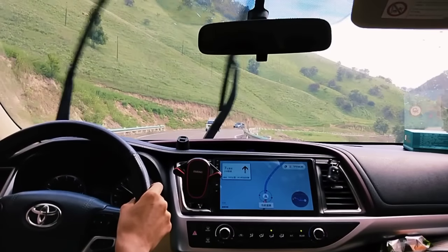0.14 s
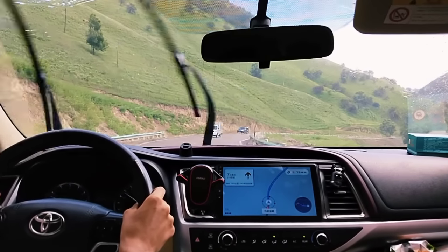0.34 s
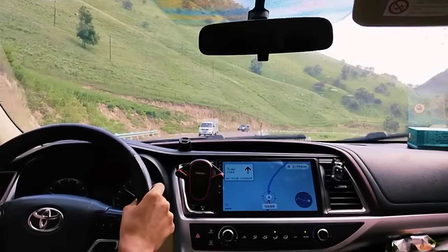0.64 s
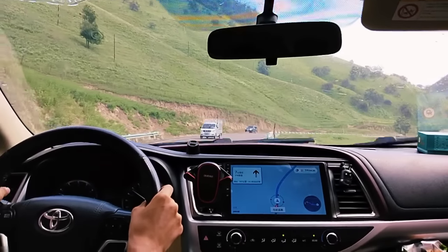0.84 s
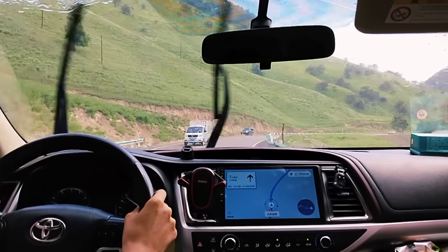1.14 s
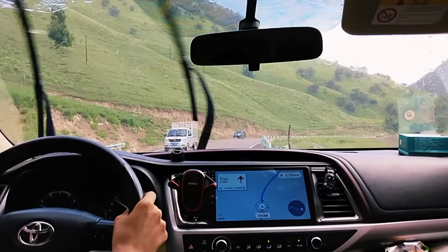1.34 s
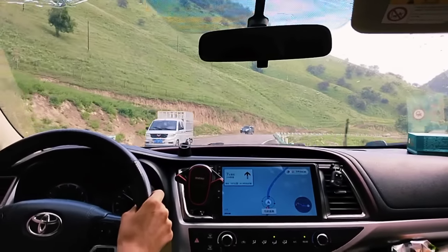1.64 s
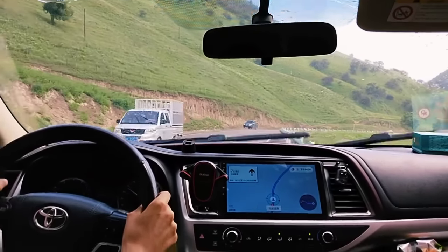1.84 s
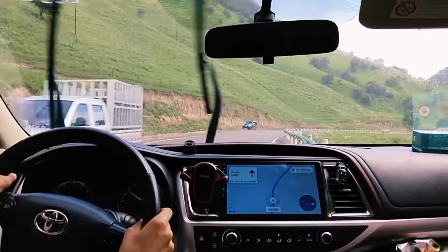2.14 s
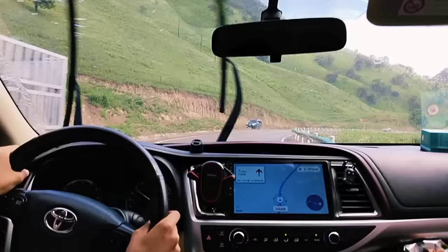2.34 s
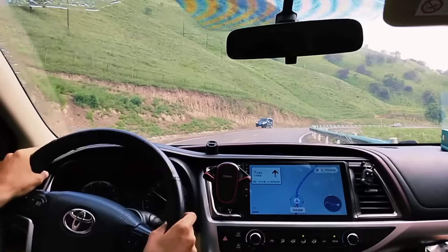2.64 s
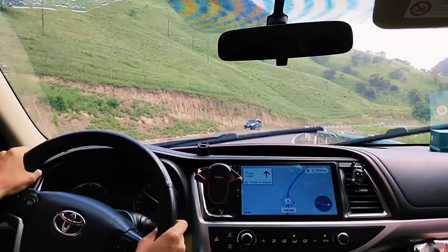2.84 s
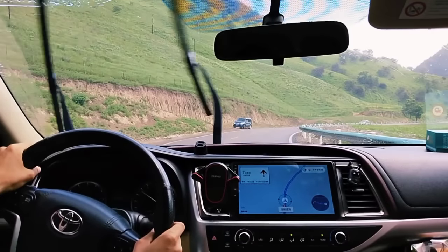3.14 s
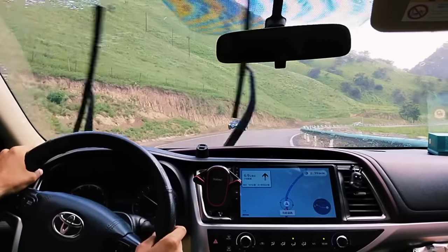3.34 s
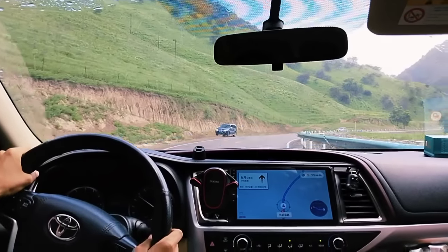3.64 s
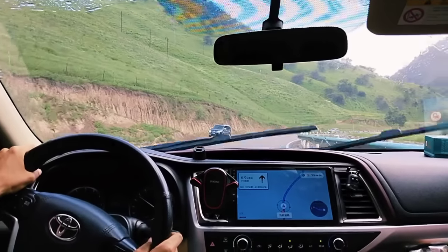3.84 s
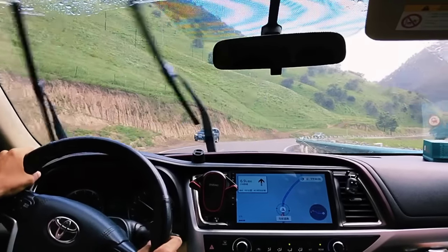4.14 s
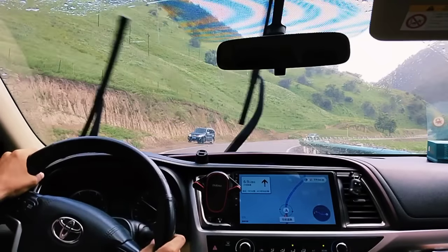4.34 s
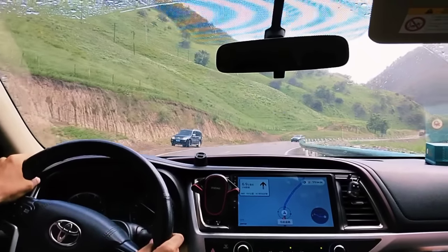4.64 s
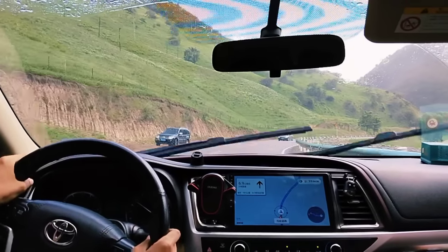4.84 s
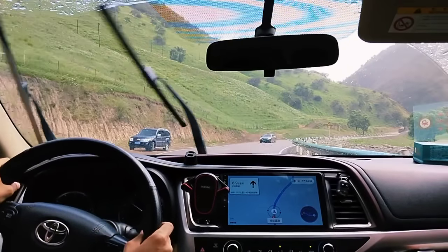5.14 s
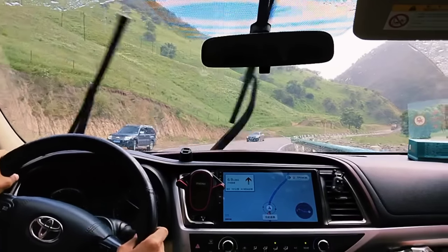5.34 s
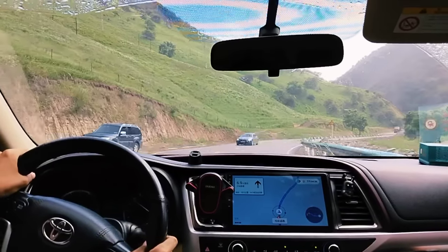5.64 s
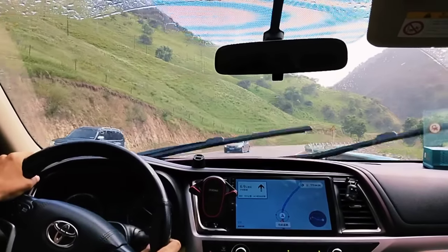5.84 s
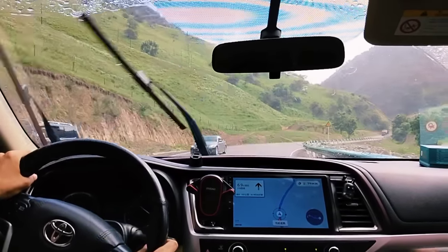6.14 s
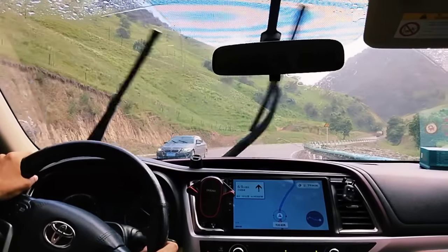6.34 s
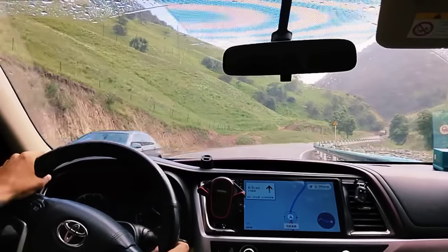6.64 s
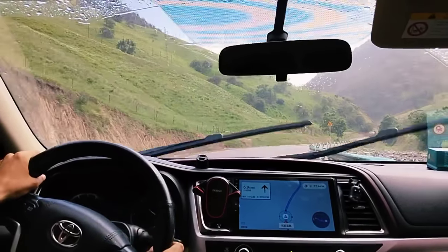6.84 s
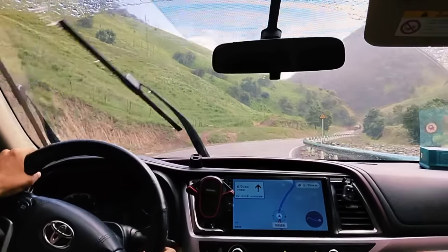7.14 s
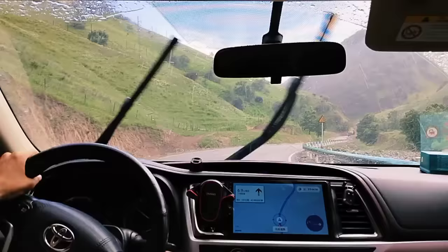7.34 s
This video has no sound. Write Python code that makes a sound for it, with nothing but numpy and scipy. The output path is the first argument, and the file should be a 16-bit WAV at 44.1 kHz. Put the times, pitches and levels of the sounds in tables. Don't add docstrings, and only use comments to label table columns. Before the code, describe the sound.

Bright rain patter fills a closed car cabin, swelling in short gusts and thinning in brief lulls. Single hard drops tick and splash close by on the glass. Beneath, muffled double thuds mark each wiper reversal at an even one-second pace, with a bump at the start and another near two seconds. Fine spray hisses behind; road rumble is very quiet and choppy from phone noise reduction.

```python
import sys
import numpy as np
from scipy import signal
from scipy.fft import rfft, irfft
from scipy.io import wavfile
from scipy.ndimage import uniform_filter1d

SR = 44100
rng = np.random.default_rng(int(sys.argv[2]) if len(sys.argv) > 2 else 0)


def wav_record(signal):
    frames = np.transpose(np.atleast_2d(signal))
    bounded = np.clip(frames, -1, 1)
    quanta = np.round(bounded * 32767).astype(np.int16)
    wavfile.write(sys.argv[1], SR, quanta)


def makeup_ratio(level_db):
    decades = np.asarray(level_db, float) / 20
    return 10 ** decades


N = 329868

# start_s, patter_db, leak_db (of the channel that never closes)
RAIN = [(0, -45.5, -60.5), (.96, -47.5, -56.5), (1.36, -49, -64.5), (1.66, -51, -58.5), (1.95, -49, -61),
        (2.3, -49, -52.5), (3.3, -47, -56.5), (3.75, -47, -56), (4.05, -50, -57), (4.25, -46, -56),
        (4.6, -44.5, -53.5), (5.07, -46.5, -51.5), (5.6, -47.5, -54.5), (5.96, -45, -51.5),
        (6.25, -48, -60.5), (6.58, -43, -53), (7.04, -47, -61), (7.48, -44, -54.5)]
# frequency_hz, density_db (per Hz)
GLASS = [(2150, -41.5), (2340, 1.5), (2660, 6), (3170, 6.5), (5210, 0.5), (7020, -5.5), (8640, -4.5),
         (11500, -15.5), (14900, -23.5), (15700, -28)]
# ring_hz, width_hz
PLACES = [(2650, 170), (3200, 69), (3900, 3100), (4500, 2600), (5600, 2400), (8500, 8000)]
# start_s, peak_db
LARGE_DROPS = [(0.022, -26), (0.386, -32), (0.776, -32), (1.323, -31.5), (1.982, -31), (2.41, -28.5),
               (2.4495, -30), (3.0418, -26), (3.056, -25), (3.2801, -30.5), (3.5749, -29), (3.6112, -30),
               (3.694, -34), (3.7622, -29), (3.782, -30), (3.8144, -30.5), (4.5799, -31), (4.633, -28.5),
               (4.7496, -32), (4.792, -30), (4.8455, -29), (5.036, -28.5), (5.0713, -29.5), (5.4472, -28.5),
               (5.9717, -29), (6.3756, -29.5), (6.5695, -34), (6.8878, -31), (7.2643, -30), (7.311, -26),
               (.0586, -42), (.11, -33.5), (0.3117, -35), (0.665, -31.5), (0.7383, -32.5), (.921, -31.5),
                 (1.163, -32), (1.3614, -33), (1.6509, -33), (1.7686, -33), (2.2095, -31.5), (2.638, -31.5),
                 (2.7063, -33.5), (2.957, -35.5), (4.1082, -32.5), (4.1564, -33), (4.2283, -30.5),
                 (4.3345, -32.5), (4.67, -30), (4.938, -33), (5.1818, -34), (5.6304, -30), (5.678, -32.5),
                 (5.7393, -34), (6.0719, -31.5), (6.1151, -32.5), (6.1487, -35.5), (6.315, -31.5),
                 (6.5386, -33.5), (6.6697, -33)]
# start_s, peak_db
TICKS = [(0.02, -9), (0.6958, -17.5), (1.085, -21), (1.6134, -22), (1.962, -13.5), (2.386, -13),
         (2.411, -21), (3.0288, -13), (3.1004, -16), (3.243, -13.5), (3.3478, -17), (3.5518, -21),
         (3.763, -52), (3.8791, -16), (4.5216, -16.5), (4.7122, -17), (4.8179, -21), (4.8504, -14),
         (5.1123, -20), (5.2825, -19), (5.5136, -14), (7.107, -16), (7.2958, -20)]
# start_s, length_s, strength_db, lowest_hz, highest_hz (channels opened)
GUSTS = [(.01, .12, -51.5, 2060, 2250), (.18, 0.049, -55, 1500, 2250), (0.307, 0.089, -55, 1500, 1690),
         (.467, 0.22, -57.5, 1690, 2250), (0.719, 0.16, -53.5, 1500, 1875), (1.32, 0.098, -50, 2250, 2250),
         (1.99, 0.31, -47, 2060, 2250), (2.07, 0.27, -60, 1125, 1875), (2.309, 0.21, -50.5, 1125, 2250),
         (2.722, 0.11, -54, 1125, 1125), (3.018, 0.14, -53, 1125, 2250), (3.16, 0.23, -52.5, 1125, 2060),
         (3.774, 0.068, -49.5, 1500, 1690), (4.311, 0.22, -58.5, 1125, 2250),
         (4.48, 0.061, -58, 1125, 2250), (4.57, 0.09, -55.5, 1125, 2250), (4.79, 0.27, -61.5, 1500, 2060),
         (5.028, .14, -54, 1125, 2250), (5.39, .09, -55.5, 1690, 2250), (5.489, 0.19, -54.5, 1690, 2250),
         (6.321, 0.19, -54.5, 1125, 2250), (6.751, 0.19, -58, 1125, 2250), (7.148, 0.36, -53, 1125, 2250),
         (7.388, 0.12, -54, 1500, 1875)]
# middle_s, length_s, depth_db
LULLS = [(0.258, 0.087, -4.5), (1.566, 0.073, -6.5), (1.932, 0.1, -3.5), (2.57, 0.41, -3.5),
         (2.88, 0.31, -6), (3.515, 0.1, -6), (3.855, 0.046, -9), (5.227, 0.3, -8), (6.476, 0.14, -9),
         (6.682, 0.15, -6.5), (6.911, 0.049, -11)]
# start_s, peak_db, boom_db, dash_db, rebound_db
FLIPS = [
    (0.39, -29, 0.5, -12, -3.5),
    (1.373, -27.5, -24, 0, -9),
    (2.348, -20, -10, -7.5, -0.5),
    (3.337, -25, -19, -12, -2.5),
    (4.319, -26, -11, -6.5, -8.5),
    (5.307, -24, -19, -3.5, -3.5),
    (6.286, -28.5, -15, -19, -10),
    (7.282, -25, -15, 0.5, 3.5),
]
# start_s, peak_db, cowl_db
BUMPS = [
    (-.008, -29.5, -5),
    (0.071, -33.5, -9),
    (.584, -42.5, -23),
    (1.644, -42, -7.5),
    (1.833, -46, -17),
    (1.979, -47, -8),
    (2.098, -35.5, -5.5),
    (6.971, -41.5, -4),
    (7.176, -41.5, -7),
]
# mode_hz, width_hz, t60_s
PANELS = [
    (83.1, 55, 0.64),
    (127.5, 50, 0.63),
    (207.2, 70, 0.57),
]
# start_s, centre_hz, length_s, level_db
STRAYS = [(.69, 406, 0.061, -56), (1.125, 2315, .04, -46), (1.298, 400, 0.033, -52.5),
          (1.36, 1133, 0.046, -57.5), (2.295, 386, 0.15, -43), (2.419, 1460, 0.063, -48),
          (2.683, 407, 0.022, -48.5), (3.099, 440, 0.027, -49), (3.222, 430, 0.099, -52.5),
          (3.534, 2120, 0.078, -51), (4.414, 610, 0.086, -55.5), (4.608, 836, 0.025, -49),
          (4.884, 938, 0.051, -56), (5.415, 1450, 0.053, -44.5), (5.856, 930, 0.087, -58),
          (6.026, 600, 0.038, -56), (6.378, 800, 0.042, -58), (6.616, 850, .04, -56),
          (6.94, 1175, .028, -48), (7.266, 402, 0.043, -44.5), (7.369, 398.5, 0.056, -54),
          (7.389, 980, .11, -58.5), (.377, 1600, 0.047, -46), (.467, 1670, 0.088, -55),
          (2.342, 1145, 0.16, -50.5), (5.038, 1167, .14, -52.5), (6.377, 1730, 0.068, -52),
          (6.76, 1172, 0.04, -44.5), (5.619, 1480, 0.1, -47.5), (3.9, 2150, 0.086, -54)]
# frequency_hz, density_db (per Hz)
ROAD = [(15, -45), (25, -2), (99, 2), (158, -3.5), (201, -0.5), (314, -4.5), (758, -17.5), (1150, -18.5),
        (1500, -85), (2530, -120)]

STANDING_OUT = LARGE_DROPS
GUST_LIFT_DB, GUST_SLOPE = 3.5, 0.75
TREBLE_DB, TREBLE_SLOPE, LEAK_SLOPE = -9.5, -0.35, 0.84
COWL_DB, BUMP_DASH_DB = -4, -16
REBOUND_S, REBOUND_DB, AGAIN_DB, BOOM_KEPT = .057, (-4.5, -12.5, -13), -8.5, .4
CHANNEL_HZ = 48000 / 256
ROAD_DB, MIDS_DB = -59, -71


def evened(x):
    return x / np.sqrt(np.mean(x ** 2) + 1e-20)


def add(mix, s, sound):
    at = round(s * SR)
    heard = sound[max(-at, 0):]
    part = mix[max(at, 0):][:len(heard)]
    part += heard[:len(part)]


def coloured(x, points):
    hz = np.fft.rfftfreq(len(x), 1 / SR)
    knots, db = np.transpose(points)
    return irfft(rfft(x) * makeup_ratio(np.interp(np.log(hz + 1), np.log(knots), db)), len(x))


def band(x, lo_hz, hi_hz, skirt_hz=25):
    hz = np.fft.rfftfreq(len(x), 1 / SR)
    outside = np.maximum(np.maximum(lo_hz - hz, hz - hi_hz), 0)
    return irfft(rfft(x) * np.exp(-(outside / skirt_hz) ** 2), len(x))


def wander(per_s):
    return evened(band(rng.standard_normal(N), 0, per_s, per_s))


def patter(per_s=42, spread_db=4.3, mist_db=-6.5):
    out, strength = np.zeros(N), np.zeros(N)
    clear = clear_of_drops()
    shape = splash(0.059, 4.4, size=4000)
    for hz, width in PLACES:
        size = np.minimum(rng.exponential(1, N), 2.2)
        hits = makeup_ratio(spread_db * size) * (rng.random(N) < per_s / SR) * clear
        power = abs(signal.oaconvolve(hits ** 2, shape ** 2)[:N])
        power = power / power.mean() + makeup_ratio(mist_db) ** 2
        strength += power / len(PLACES)
        splash_rms = np.sqrt(np.mean(hits ** 2) * np.sum(shape ** 2))
        snaps = 5 * np.convolve(hits, [.5, 1, .5], "same") / splash_rms
        splashes = np.sqrt(power) * rng.standard_normal(N)
        out += on_glass(splashes + snaps, hz, width)
    treble = band(out, 7000, SR / 2, 1940)
    level_db, _, treble_db = rain_db()
    return makeup_ratio(level_db) * evened(out - treble + makeup_ratio(11.5 + treble_db) * treble), strength


def big_drops(trim_db=-12):
    places, strength = np.zeros((len(PLACES), N)), np.zeros(N)
    shape = splash(0.1, 6.9, size=3000)
    snap = 10 * np.maximum(1 - abs(np.arange(3000) - 6) / 2, 0)
    noises = rng.standard_normal((len(STANDING_OUT), 3000))
    for k, ((s, db), noise) in enumerate(zip(STANDING_OUT, noises)):
        peak = makeup_ratio(db + trim_db)
        add(places[k * 5 % len(PLACES)], s, peak * (shape * noise + snap))
        add(strength, s, (peak * shape) ** 2)
    return sum(on_glass(x, *ring) for x, ring in zip(places, PLACES)), strength


def bright_ticks():
    out = np.zeros(N)
    shape = splash(.035, 3, size=1500)
    for (s, db), noise in zip(TICKS, rng.standard_normal((len(TICKS), 1500))):
        add(out, s, makeup_ratio(db - 23.0) * shape * noise)
    return signal.sosfilt(signal.butter(2, [5000, 10500], "bandpass", fs=SR, output="sos"), out)


def splash(t60, tick_db, size):
    t = np.arange(size) / SR
    ring = makeup_ratio(-60 * t / t60)
    tick = makeup_ratio(tick_db - 60 * t / .008)
    return (ring + tick) * (1 - np.exp(-t / .0002))


def on_glass(x, hz, width, lift=1.1):
    f = abs(np.fft.fftfreq(4096, 1 / SR))
    knots, db = np.transpose(GLASS)
    ring = 1 + lift / (1 + (2 * (f - hz) / width) ** 2)
    gain = makeup_ratio(np.interp(np.log(f + 1), np.log(knots), db)) * ring
    taps = np.fft.ifft(np.exp(signal.hilbert(np.log(gain)).conj())).real[:2048]
    return signal.oaconvolve(x, taps / np.linalg.norm(taps))[:N]


def clear_of_drops(before_s=.017, after_s=.004):
    clear = np.ones(N)
    for s, _ in STANDING_OUT:
        clear[round(max(s - before_s, 0) * SR):round((s + after_s) * SR)] = 0
    return clear


def rain_db():
    t = np.arange(N) / SR
    s, steady, leak = np.transpose(RAIN)

    def hump(middle, length):
        return np.cos(np.pi * np.clip((t - middle) / length, -.5, .5)) ** 2

    swing = sum(db * hump(at, length) for at, length, db in LULLS)
    for at, length, db, *_ in GUSTS:
        lift_db = GUST_LIFT_DB + GUST_SLOPE * (db + 53.5)
        swing = swing + lift_db * hump(at + length / 2, 1.51 * length)
    level_db = np.interp(t, s, steady) + swing
    leak_db = np.interp(t, s, leak) + LEAK_SLOPE * np.minimum(swing, 3.5)
    return level_db, leak_db, TREBLE_DB + TREBLE_SLOPE * (level_db + 50.5)


def thuds(rise=.018, lead=.015, hold=.18, shaky=.4, punch=.9):
    out, t = np.zeros(N), np.arange(16000) / SR
    shut = (1 + punch * np.exp(-((t - .033) / .014) ** 2)) / (1 + (t / hold) ** 4)
    rows = blows()
    for (s, db, *shares), luck in zip(rows, rng.standard_normal((len(rows), 3, 16001))):
        for (hz, width, t60), share_db, z in zip(PANELS, shares, luck):
            tuned_hz = hz * (1 + 0.017 * z[0])
            ring = np.sqrt(2) * np.cos(2 * np.pi * tuned_hz * (t - .031))
            shake = evened(band(z[1:], hz - width / 2, hz + width / 2, width / 2))
            shape = (1 - np.exp(-(t / rise) ** 2)) * makeup_ratio(-60 * t / t60) * shut
            blow = shape * ((1 - shaky) * ring + shaky * shake)
            add(out, s - lead, makeup_ratio(db + share_db - 4.5) * blow)
    return out


def blows():
    rows = [(s, db, 0, cowl_db, BUMP_DASH_DB) for s, db, cowl_db in BUMPS]
    for s, db, boom_db, dash_db, back_db in FLIPS:
        colour = np.add(REBOUND_DB, [BOOM_KEPT * boom_db, 0, 0])
        rows.append((s, db, boom_db, COWL_DB, dash_db))
        rows.append((s + REBOUND_S, db + back_db, *colour))
        rows.append((s + 2 * REBOUND_S, db + back_db + AGAIN_DB, *colour))
    return rows


def openings(beat, lag=.005, sag_db=7, flutter_db=3.0, blips_per_s=11):
    level_db, leak_db, _ = rain_db()
    flutter = makeup_ratio(-3.74 + flutter_db * np.minimum(wander(12.0), 1.2))
    out = channel(1319.0, rng.standard_normal(N)) * makeup_ratio(leak_db) * flutter

    when, which, long, loud = rng.random((round(blips_per_s * N / SR), 4)).T
    blip_hz = CHANNEL_HZ * np.round(5.5 + 7 * which ** .7)
    blip_db = -67 + 7 * loud + .6 * (level_db[(when * N).astype(int)] + 48)
    blips = np.c_[when * N / SR, blip_hz, .025 + .03 * long, blip_db]

    rows = np.r_[STRAYS, blips, gust_openings(), drop_openings()]
    for (s, hz, length, db), z in zip(rows, rng.standard_normal((len(rows), 16384))):
        t = np.arange(min(round(length * SR), len(z))) / SR
        ramps = np.minimum(t / 0.0068, (length - t) / 0.01)
        shape = np.sin(np.pi / 2 * np.clip(ramps, 0, 1))
        waver_db = 3.5 * np.sin(2 * np.pi * t / 0.16 + 2.8)
        add(out, s + lag, makeup_ratio(db - sag_db * t / length + waver_db) * shape * channel(hz, z)[:len(t)])
    return out * beat


def channel(hz, z):
    return evened(band(z, hz - CHANNEL_HZ / 3, hz + CHANNEL_HZ / 3, 15.5))


def gust_openings(blip_s=.05, share=.2, spread_db=17, off_hz=60, top_db=-0.5, low_db=1.5, lift_db=5.0,
                  edge_share=.45):
    rows, grid = [], CHANNEL_HZ * np.arange(6, 13)
    for (s, length, db, lo_hz, hi_hz), luck in zip(GUSTS, rng.random((len(GUSTS), len(grid), 2, 4))):
        for hz, blinks in zip(grid, luck):
            in_range = lo_hz - CHANNEL_HZ / 2 < hz < hi_hz + CHANNEL_HZ / 2
            if not in_range or hz == grid[1]:
                continue
            lowest, top = hz == grid[0], hz > grid[4]
            stay_share = edge_share if lowest or top else share
            for half, (late, long, soft, off) in enumerate(blinks):
                stays = min(blip_s * long + stay_share * length, length)
                start = s + (half + late) / 2 * (length - stays)
                centre_hz = hz + off_hz * (off - .3 + .5 * lowest)
                rows.append((start, centre_hz, stays,
                             db + lift_db + top_db * top + low_db * lowest - spread_db * soft))
    return rows


def drop_openings(below_db=-30, spread_db=9, reach=2.5):
    rows = []
    for (s, db), (deep, long, soft) in zip(STANDING_OUT, rng.random((len(STANDING_OUT), 3))):
        hz = CHANNEL_HZ * (12 - np.floor(reach * deep ** 2 * 2))
        rows.append((s - .01, hz, 0.019 + 0.033 * long, db + below_db - spread_db * soft))
    return rows


def road():
    low = evened(coloured(rng.standard_normal(N), ROAD)) * makeup_ratio(ROAD_DB + 2.1 * wander(17))
    mids = evened(band(rng.standard_normal(N), 1174, 2050, 110)) * makeup_ratio(MIDS_DB + 0.42 * wander(22))
    rain = makeup_ratio(rain_db()[0])
    return low + mids * rain / rain.mean()


def spray(level_db=-66, follow=0.55):
    colour = [(4000, -16), (7000, -7.5), (9500, -5.5), (12000, -21), (15700, -21)]  # (Hz, dB)
    hiss = coloured(rng.standard_normal(N), colour)
    return evened(hiss) * makeup_ratio(level_db + follow * (rain_db()[0] + 45.5))


def scene():
    small, small_power = patter()
    big, big_power = big_drops()
    power = uniform_filter1d(small_power * makeup_ratio(rain_db()[0]) ** 2 * 0.4 + big_power, 260)
    beat = (power / uniform_filter1d(power, 6000)) ** 0.36
    return (small + big + bright_ticks() + thuds() + openings(beat) + road() + spray())[None]


def suppress(x, margin_db=-2.5, depth_db=7):
    hz, _, z = signal.stft(x, SR, nperseg=236, noverlap=177)
    level = 10 * np.log10(uniform_filter1d(abs(z) ** 2, 24, axis=1) + 1e-16)
    under = np.percentile(level, 15, axis=1)[:, None] + margin_db - level
    cut_db = depth_db * (hz > 2400)[:, None] / (1 + np.exp(-under))
    return signal.istft(z * makeup_ratio(-cut_db), SR, nperseg=236, noverlap=177)[1][:N]


def roll_off(x):
    return signal.sosfilt(signal.butter(12, 15800, fs=SR, output="sos"), x)


def record(dry):
    calm = 1 / (1 + (makeup_ratio(rain_db()[0]) / makeup_ratio(-48.5)) ** 3)
    held = dry[0] - .9 * calm * band(dry[0], 4810, 4930, 30)
    held = suppress(held)
    rim = band(held, 15520, 15780, 30)
    power = uniform_filter1d(rim ** 2, 600)
    hit = uniform_filter1d(1. * (power > np.percentile(power, 85)), 200)
    mix = band(held, 0, 15480, 15) + .5 * rim * hit
    return roll_off(mix[None])


dry = scene()
out = record(dry)
wav_record(out)
```